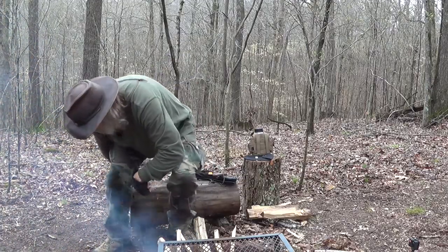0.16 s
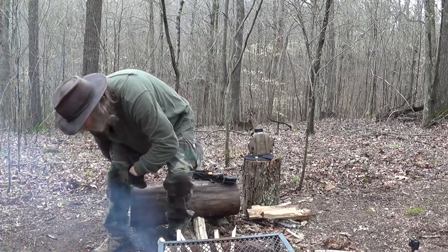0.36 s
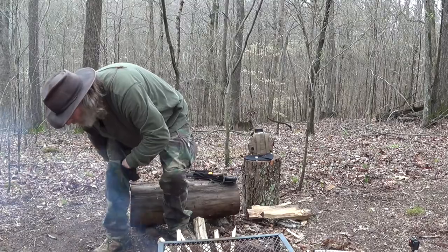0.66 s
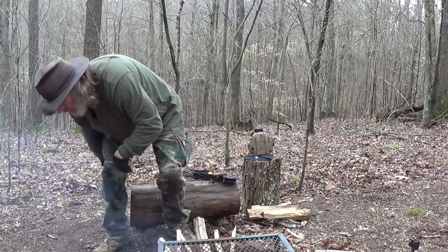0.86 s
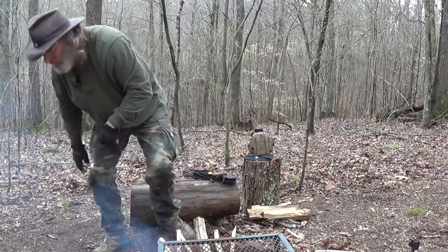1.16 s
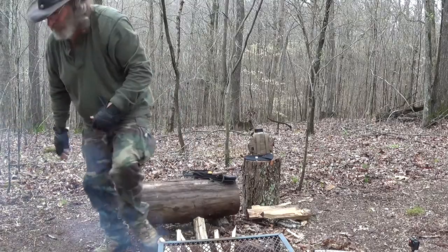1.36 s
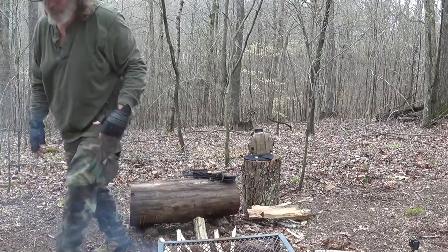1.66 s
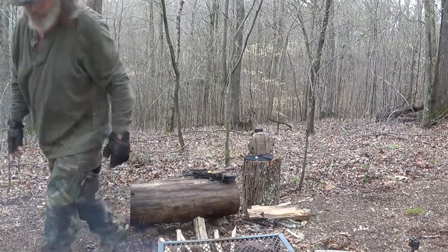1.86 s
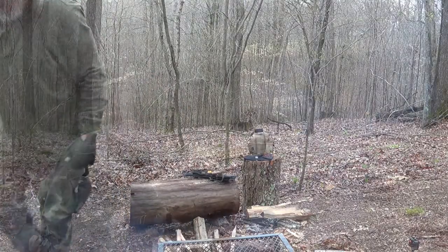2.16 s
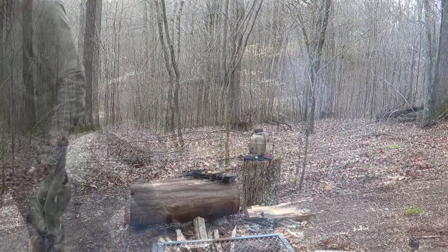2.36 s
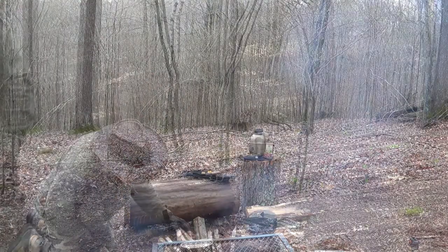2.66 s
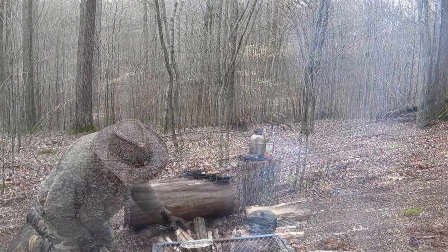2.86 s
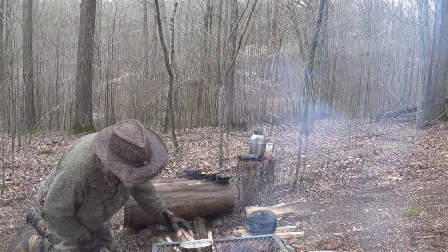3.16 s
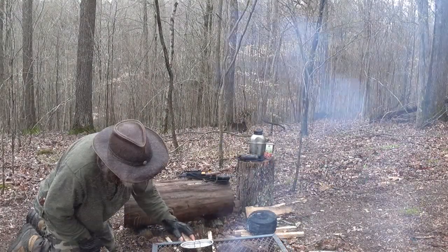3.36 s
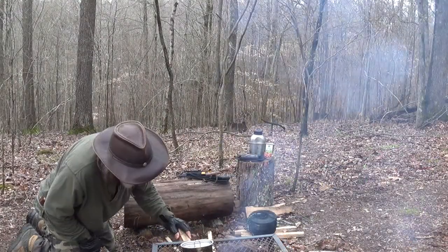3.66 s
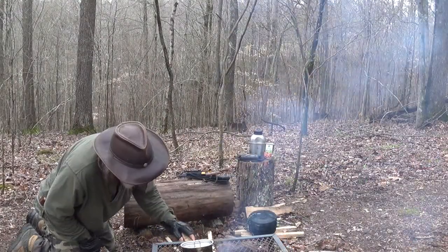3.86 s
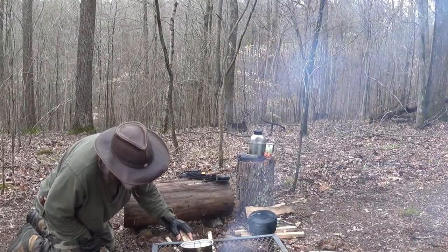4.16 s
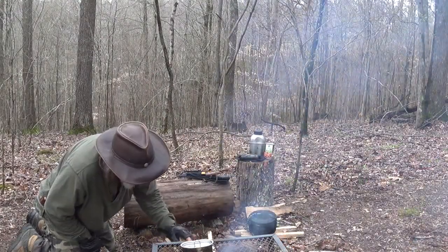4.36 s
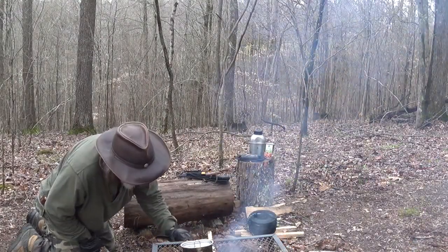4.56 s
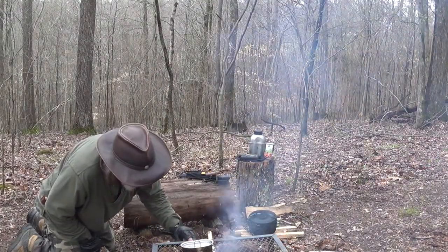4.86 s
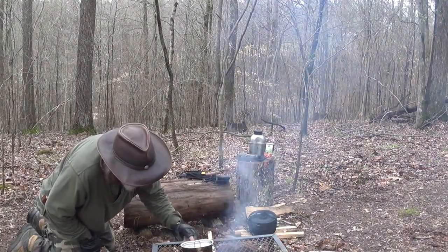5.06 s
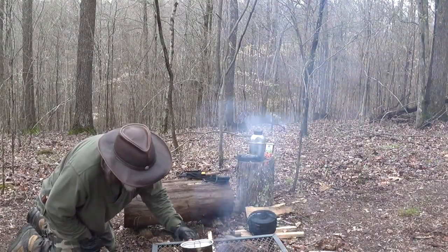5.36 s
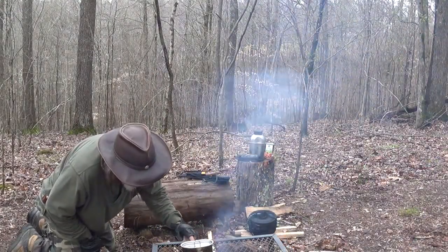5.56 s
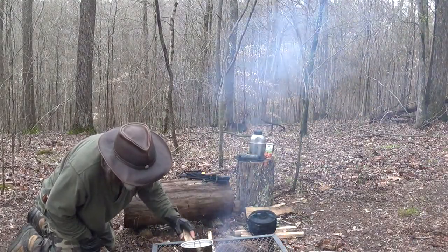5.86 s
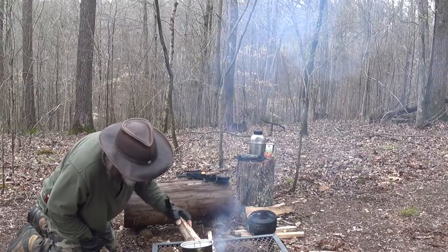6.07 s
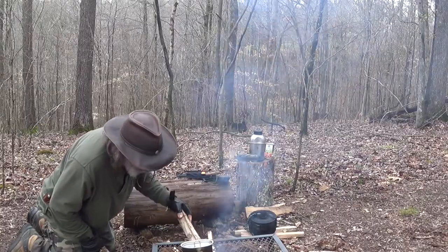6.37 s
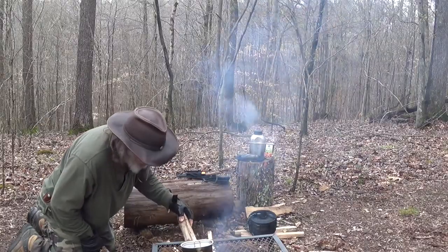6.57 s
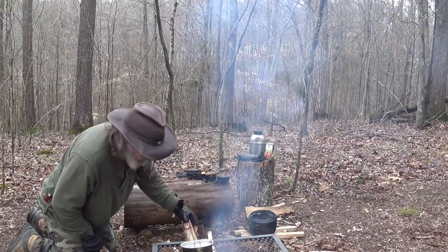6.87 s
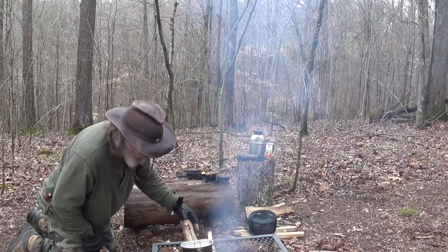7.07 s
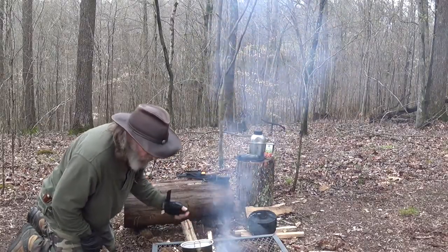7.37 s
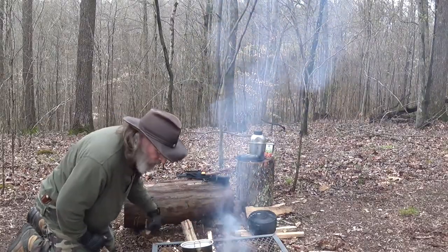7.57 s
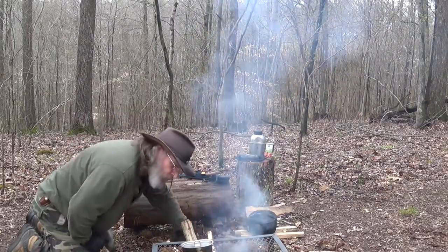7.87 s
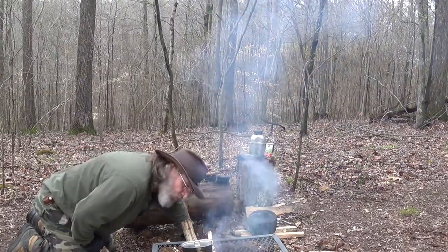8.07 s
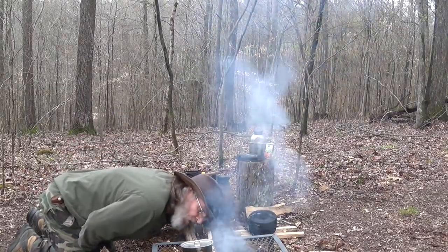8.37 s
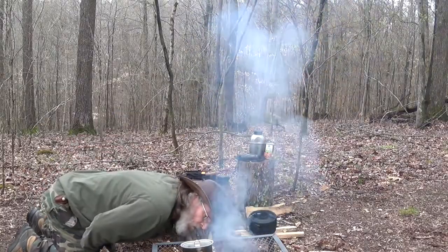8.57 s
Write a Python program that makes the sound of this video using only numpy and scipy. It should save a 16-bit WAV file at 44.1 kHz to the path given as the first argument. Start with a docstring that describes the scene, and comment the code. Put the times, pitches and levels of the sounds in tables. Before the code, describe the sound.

A campfire of damp wood burns close to the microphone in quiet woods. It starts with light ticks and a few faint steps in dry leaves, just to the left. A steamy hiss and crackling build, then hold steady. One very loud pop cracks about halfway through, with several more sharp snaps after it. Small birds whistle faintly in the distance over still air and a barely audible electronic whine.

```python
"""A campfire of damp wood, close to the microphone in open woods.
The logs split in sharp pops, steam hisses, sings and spits from them, and the flames murmur.
Just to the left someone gets up and scuffs through the leaves; two small birds whistle far off
among the trees. Under it all lie the air of the woods and the camera's faint electronic whine."""
import sys
import numpy as np
from scipy import signal
from scipy.io import wavfile
from scipy.ndimage import uniform_filter1d

SR = 44100
rng = np.random.default_rng(int(sys.argv[2]) if len(sys.argv) > 2 else 0)


def master(y):
    """Save y as 16-bit WAV."""
    cut = np.clip(np.atleast_2d(y).T, -1, 1)
    pcm = np.round(cut * 32767)  # scale
    wavfile.write(sys.argv[1], SR, pcm.astype(np.int16))


N = 384111
TIME_S, BINS_HZ = np.arange(N) / SR, np.fft.rfftfreq(1024, 1 / SR)
# the steam grows louder first, then the flames: start_s, end_s, before_db, after_db
STEAM_RISE, FLAME_RISE = (0.94, 3.5, -67, -52), (2.5, 4.1, -74.5, -66.5)


# wood splitting close by: start_s, level_db, knock_lift_db, knock_hz, splinters_over_snap_db
WOOD_POPS = [(0.3184, -35.5, -21, 1500, 3.5), (1.381, -37, -2, 1500, 0), (1.6325, -38.5, 1, 1000, 7),
             (2.0044, -28.5, -9, 1500, -1.5), (2.221, -39, 13, 650, 8), (2.9927, -35, 19, 650, 4),
             (3.2148, -30.5, 15, 700, 0), (3.4283, -27.5, -8, 1500, -2), (3.437, -29, -12, 1500, 4),
             (3.899, -30, -7, 1500, 3), (3.911, -30, -4, 1500, 2), (4.0259, -0.5, 2.5, 1900, 1),
             (4.5136, -23, -7, 1500, -3), (4.6705, -31, 7, 650, 6), (5.016, -18.5, -18, 1830, -20),
             (5.4398, -29, 10, 1000, 2.5), (5.588, -28.5, -4, 1490, 1), (6.2427, -30, 1, 1400, 4.5),
             (6.6507, -18.5, 12.5, 1100, -2), (7.5175, -10, -5.5, 1400, -2), (8.1925, -29, -1, 1500, -10)]
# spectrum of cracking wood: frequency_hz, level_db
CRACK_COLOUR = [(100, -21), (350, -30), (550, -15.5), (1000, -12), (1700, -6), (2500, -6.5), (3600, -7),
                (5200, -2), (7000, -3), (9500, 0), (11700, -4.5), (12600, -12.5), (15000, -12),
                (16000, -21)]
# ring of the burning logs: pitch_hz, level_over_crack_db, t60_s
LOG_RING = [(1595, -33.5, 0.016), (1900, -53, .02), (2450, -43, 0.013), (5220, -44, 0.022),
            (6130, -44, 0.028), (9700, -44, .02)]
# first echoes to reach the microphone: delay_s, level_db
FIRST_ECHOES = [(.0097, -20), (0.021, -33)]

def pops(snap_db=3, knock_octaves=1.2, splinter_s=0.0024, front_s=.0012):
    """A snap, then a few milliseconds of splintering, ringing through the log and bouncing back."""
    out, t = np.zeros(N), np.arange(2048) / SR
    snap = t == 0
    ring = sum(gain_of(db - 60 * t / t60) * np.cos(2 * np.pi * hz * t) for hz, db, t60 in LOG_RING)
    colour_db = at_hz(CRACK_COLOUR, BINS_HZ) - 3.5 * bump(BINS_HZ, centre=1280, width=150)
    for s, db, knock_db, knock_hz, splinter_db in WOOD_POPS + ticks():
        splinters = rng.choice([-1, 1], len(t)) * np.exp(-t / splinter_s) * (t > .0004)
        fracture = snap + gain_of(splinter_db) * splinters / np.linalg.norm(splinters)
        lift_db = knock_db / (1 + (np.log2((BINS_HZ + 1) / knock_hz) / knock_octaves) ** 4)
        crack = signal.fftconvolve(fracture, click(colour_db + lift_db))
        pop = gain_of(db + snap_db) * signal.fftconvolve(crack, snap + ring)
        add(out, s + front_s, pop)
        for delay, echo_db in FIRST_ECHOES:
            add(out, s + front_s + delay, gain_of(echo_db) * pop)
    return out


def ticks(count=120, per_s=7, over_steam_db=18, spread_db=3,
          knock_spread_db=4, knock_hz=1400, splinter_db=-2):
    """Small pops at random moments, louder as the steam grows; rows like those of WOOD_POPS."""
    times = np.cumsum(rng.exponential(1, count)) / per_s
    sizes, knocks = rng.standard_normal((count, 2)).T
    levels = rise(times, *STEAM_RISE) + over_steam_db + spread_db * sizes
    return [(s, db, knock_spread_db * knock, knock_hz, splinter_db)
            for s, db, knock in zip(times, levels, knocks) if s < N / SR]


def thud(cracks, level_db=-32, swell_s=.02, t60_s=0.22, band_hz=(130, 330)):
    """The low part of each pop swells after it and rolls on between the trunks."""
    t = np.arange(SR // 2) / SR
    roll = gain_of(-60 * t / t60_s) ** 2 * (1 - np.exp(-t / swell_s))
    power = abs(signal.fftconvolve(cracks ** 2, roll / roll.sum())[:N])
    rumble = signal.sosfilt(signal.butter(2, band_hz, "band", fs=SR, output="sos"), rng.standard_normal(N))
    return gain_of(level_db) * np.sqrt(power) * unit_rms(rumble)


# spectrum of the steam at close range: frequency_hz, level_db
HISS_COLOUR = [(250, -48), (450, -9.5), (750, -4), (1500, -4), (2600, -6), (3800, -4), (5500, -4),
               (7000, -4), (8300, -3.5), (9700, -1), (11500, -5), (13000, -9), (15400, -10.5), (16500, -38)]
# cracks that the steam blows through: centre_hz, width_hz, lift_db
STEAM_VENTS = [(2180, 290, 4), (4960, 270, 4), (5570, 350, 4.0), (8800, 370, 1.5), (9550, 1120, 4),
               (11450, 700, 3.0), (13000, 1000, -0.5)]

def steam(hiss_db=-0.16, fizz_db=-14, bubbles_per_s=400, spread_db=5.0):
    """Steam hisses from cracks in the logs while tiny bubbles of sap burst in it."""
    bursting = rng.random(N) < bubbles_per_s / SR
    sizes = gain_of(spread_db * np.minimum(rng.exponential(1, N), 4))
    bursts = bursting * sizes * rng.choice([-1, 1], N)
    fizz = unit_rms(signal.oaconvolve(bursts, click(at_hz(CRACK_COLOUR, BINS_HZ)))[:N])
    hiss = wash(HISS_COLOUR, patchy_db=0.93, resonances=STEAM_VENTS)
    strength = burning(STEAM_RISE, sway_db=0.8, sways_per_s=2.99)
    return strength * (gain_of(hiss_db) * hiss + gain_of(fizz_db) * fizz)


# spits of boiling sap: start_s, level_db, length_s
SAP_SPITS = [(2.565, -55.5, 0.24), (3.228, -53, 0.036), (3.428, -46, 0.024), (3.46, -54.5, 0.13),
             (3.897, -42.5, 0.025), (4.609, -50.5, 0.07), (5.425, -49, 0.16)]
# spectrum of a spit: frequency_hz, level_db
SPIT_COLOUR = [(200, -22), (1500, -6.5), (5000, -4.0), (9000, 2.5), (12000, -2.5), (16000, -22)]

def spits(grain_db=7.0):
    """A pocket of sap boils over: a quick grainy spurt that dies away."""
    out, t = np.zeros(N), np.arange(SR // 2) / SR
    for s, db, length in SAP_SPITS:
        age = 3 * t / length
        spurt = age * np.exp(1 - age)
        noise, grains = rng.standard_normal((2, len(t)))
        add(out, s, gain_of(db) * spurt * unit_rms(noise * gain_of(grain_db * grains)))
    return signal.oaconvolve(out, click(at_hz(SPIT_COLOUR, BINS_HZ)))[:N]


# a thin jet of steam: time_s, pitch_hz
JET_PITCH = [(0, 10160), (.39, 10100), (.5, 9920), (.75, 9870), (1.0, 10010), (1.4, 9760), (1.8, 9900)]

def jet(level_db=-71.5, centre_hz=10000, db_per_hz=.008, waver=.0006, stop_s=2.1, fade_s=.2):
    """A pinhole in a log whistles, higher and louder the harder it blows, until it dries up."""
    hz = follow(JET_PITCH)
    blowing = np.clip((stop_s - TIME_S) / fade_s, 0, 1)
    strength = blowing * gain_of(level_db + db_per_hz * (hz - centre_hz))
    cycles = np.cumsum(hz * (1 + waver * drift(N, per_s=200))) / SR
    return strength * np.sqrt(2) * np.sin(2 * np.pi * cycles)


# steam squealing in the logs: start_s, length_s, pitch_hz, level_db
STEAM_SQUEALS = [(1.87, 0.16, 9700, -70), (4.3, 0.21, 9500, -60.5), (4.35, 0.15, 11700, -60),
                 (6.2, .22, 8850, -61), (8.05, .16, 7900, -67)]

def squeals(count=110, peeps_per_s=6, peep_s=.09, peep_hz=9450, spread_hz=450, over_steam_db=-11.5):
    """Escaping steam gives short breathy squeals, with fainter peeps at random moments."""
    times = np.cumsum(rng.exponential(1, count)) / peeps_per_s
    pitches = peep_hz + spread_hz * rng.standard_normal(count)
    levels = rise(times, *STEAM_RISE) + over_steam_db
    peeps = [(s, peep_s, hz, db) for s, hz, db in zip(times, pitches, levels) if s < N / SR]
    return rasps(STEAM_SQUEALS + peeps, sag_share=.025, width_share=.018)


# spectrum of the flames: frequency_hz, level_db
MURMUR_COLOUR = [(25, -22), (45, -15), (70, -5), (110, 2), (165, -4), (260, 0), (390, -5), (600, -10),
                 (1000, -17), (2000, -50)]
# the flames flare up: centre_s, length_s, lift_db
FLARE_UPS = [(6.45, .09, 5.5), (6.997, 0.17, 2.5)]

def flames():
    """The flames murmur, grow and now and then flare."""
    flare_db = sum(db * bump(TIME_S, s, length) for s, length, db in FLARE_UPS)
    strength = burning(FLAME_RISE, sway_db=1.0, sways_per_s=6.6)
    return strength * gain_of(flare_db) * wash(MURMUR_COLOUR, patchy_db=0.5)


# steps on the leafy ground: start_s, length_s, sole_db, leaves_db
FOOTSTEPS = [(1.14, 0.19, -64.5, -63), (1.703, .15, -73, -66), (2.551, .04, -64.5, -65)]

def boots(crunch_db=-1.5, crackle_db=3.5):
    """The sole presses the soil while dry leaves rustle and crunch under it."""
    out = np.zeros(N)
    for s, length, sole_db, leaves_db in FOOTSTEPS:
        rustle = rasp(length, hz=1700, width_hz=1900)
        crunch = gain_of(crunch_db) * rasp(length, hz=7500, width_hz=9100)
        crackle = unit_rms(gain_of(crackle_db * drift(len(rustle), per_s=300)))
        sole = rasp(length, hz=344, width_hz=167)
        add(out, s, gain_of(sole_db) * sole + gain_of(leaves_db) * crackle * (rustle + crunch))
    return out


# wood being moved: start_s, length_s, pitch_hz, level_db
WOOD_SCRAPES = [(1.19, 0.14, 1830, -61), (1.27, .26, 1760, -69), (2.59, .2, 2000, -69),
                (7.41, 0.092, 1550, -63), (8.485, 0.053, 1450, -62.5)]

def scrapes():
    """Friction makes the wood scrape and squeak, sinking a little in pitch."""
    return rasps(WOOD_SCRAPES, sag_share=0.0604, width_share=0.18)


# a distant song, high slurs alternating with low notes: delay_s, length_s, full_reach_top_hz, lift_db
SONG_NOTES = [(0, .05, 2860, -4.5), (.122, .09, 2450, -7.5), (.245, 0.062, 3170, 1.5),
              (.372, .11, 2310, -8.5), (0.491, 0.0615, 3076, 0)]
# the bird sings twice: start_s, level_db, reach_share (of each note's height above low_hz)
SONG_TURNS = [(4.99, -52.5, 0.93), (6.61, -57, .8)]
# another distant bird's plain whistles, and last a short squeak: start_s, length_s, pitch_hz, glide_share,
# level_db
PLAIN_WHISTLES = [(1.88, 0.28, 3845, -0.011, -66), (2.195, 0.212, 5990, -0.013, -62),
                  (2.943, 0.039, 3050, 0.038, -59)]

def birds(low_hz=2263, direct_db=-0.7, echo_db=-8.5):
    """Two birds far off, smeared by the trees; the higher a note of the song, the further it slides."""
    out = np.zeros(N)
    slur = np.array([0.833, 1, 0.493])  # start, top and end, as shares of the note's height
    for s, db, reach in SONG_TURNS:
        for delay, length, top_hz, lift_db in SONG_NOTES:
            arch_hz = low_hz + reach * (top_hz - low_hz) * slur
            add(out, s + delay, gain_of(db + lift_db) * bird_note(length, *arch_hz))
    for s, length, hz, glide, db in PLAIN_WHISTLES:
        add(out, s, gain_of(db) * bird_note(length, hz * (1 - glide), hz, hz * (1 + glide), waver=.002))
    return gain_of(direct_db) * out + gain_of(echo_db) * scatter(out, WOODS_DECAY, wait_s=0.023)


def bird_note(length_s, start_hz, top_hz, end_hz, slide_swell=12, waver=0.0037):
    """A whistle through three pitches that swells as it slides; rms 1."""
    progress = np.linspace(0, 1, int(length_s * SR))
    hz = np.interp(progress, [0, 1 / 3, 1], [start_hz, top_hz, end_hz])
    hz *= 1 + waver * drift(len(hz), per_s=214)
    swell = 1 + slide_swell * progress * abs(top_hz - end_hz) / top_hz
    return unit_rms(swell * signal.windows.tukey(len(hz), .4) * np.sin(2 * np.pi * np.cumsum(hz) / SR))


# spectrum of the open woods: frequency_hz, level_db
AIR_COLOUR = [(60, -12), (110, 0), (200, -5.5), (550, 2), (1100, 0.5), (2500, -1), (5000, -4), (10000, -9),
              (13000, -11), (16000, -22.5)]

def air(level_db=-60.5):
    """Still air, a faint even hush all around the microphone."""
    return gain_of(level_db) * wash(AIR_COLOUR, patchy_db=.5)


# tones of the camera's electronics: pitch_hz
WHINE_PITCHES = [2757, 7867, 15734]
# for each tone: level_db, pulsed_share, flutter_share
WHINE_TONES = [(-71.5, .97, 0), (-78, .9, 0), (-67, 0, .45)]
# the pulsing tones dip and come back louder: time_s, fully_pulsed_lift_db
PULSE_LIFT = [(1.7, -1.5), (2.4, -11), (3.0, -4), (3.7, 2)]

def whine(pictures_per_s=29.97, first_pulse_s=.0042, pulse_s=.0032, flutter_hz=13.08):
    """Thin tones of the camera's electronics: the lower two pulse once per picture, the top flutters."""
    out = np.zeros(N)
    from_pulse_s = np.sin(np.pi * pictures_per_s * (TIME_S - first_pulse_s)) / (np.pi * pictures_per_s)
    pulses = np.exp(-(from_pulse_s / pulse_s) ** 2)
    flutter = np.sin(2 * np.pi * flutter_hz * TIME_S)
    for hz, (db, pulsed, fluttered) in zip(WHINE_PITCHES, WHINE_TONES):
        envelope = 1 - pulsed + pulsed * pulses + fluttered * flutter
        tone = unit_rms(envelope * np.sin(2 * np.pi * hz * TIME_S))
        out += gain_of(db + pulsed * follow(PULSE_LIFT)) * tone
    return out


# echoes among the trees, near the fire and in the hearth, each: frequency_hz, t60_s
WOODS_DECAY = [(150, 0.36), (500, 0.81), (2000, 0.85), (6000, 1), (14000, 0.28)]
NEAR_DECAY = [(150, .25), (500, 0.16), (1500, .09), (4000, 0.16), (14000, .1)]
HEARTH_DECAY = [(500, 0.019), (3000, 0.062), (12000, 0.028)]

def scatter(sound, decay, wait_s, mono_above_hz=4000):
    """Echoes off ground and trunks: sparse taps that die by band, nearly mono in the treble."""
    taps = rng.standard_normal((2, SR)) * (rng.random((2, SR)) < .05)
    taps *= np.arange(SR) > wait_s * SR
    hz, t, spectra = signal.stft(taps, SR, nperseg=256)
    mid, side = spectra * gain_of(-60 * t / at_hz(decay, hz)[:, None])
    side /= 1 + (hz[:, None] / mono_above_hz) ** 2
    tail = signal.istft(np.array([mid + side, mid - side]), SR, nperseg=256)[1]
    return signal.fftconvolve(sound[None], tail / np.linalg.norm(tail[0]), axes=1)[:, :N]


# how alike left and right are at the microphone: frequency_hz, likeness_share
STEREO_LIKENESS = [(60, 0.94), (120, 0.99), (240, 0.91), (480, 0.34), (950, 0.1), (1890, 0.23),
                   (3770, 0.85), (7520, 1.0), (15000, 1.0)]

def wash(colour, patchy_db, resonances=()):
    """Stereo noise of rms 1 with drifting patches, lifted at its resonances."""
    mid_re, mid_im, side_re, side_im, patches = rng.standard_normal((5, N // 256 + 5, len(BINS_HZ)))
    patches = uniform_filter1d(patches, size=12, axis=0)  # smooth in time
    patches = unit_rms(uniform_filter1d(patches, size=9, axis=1))  # and in frequency
    colour_db = at_hz(colour, BINS_HZ) + sum(db * bump(BINS_HZ, hz, width) for hz, width, db in resonances)
    likeness = at_hz(STEREO_LIKENESS, BINS_HZ)
    mid = np.sqrt(1 + likeness) * (mid_re + 1j * mid_im)
    side = np.sqrt(1 - likeness) * (side_re + 1j * side_im)
    spectra = np.array([mid + side, mid - side]) * gain_of(colour_db + patchy_db * patches)
    return unit_rms(signal.istft(spectra.transpose(0, 2, 1), nperseg=1024, noverlap=768)[1][:, :N])


def rasps(rows, sag_share, width_share):
    """Squeals or scrapes, each sinking and spreading by the same share of its pitch."""
    out = np.zeros(N)
    for s, length, hz, db in rows:
        add(out, s, gain_of(db) * rasp(length, hz, width_share * hz, sag_share))
    return out


def rasp(length_s, hz, width_hz, sag_share=0):
    """Turbulence or friction stirs one resonance, which may sink; rms 1."""
    n = int(length_s * SR)
    noise = rng.standard_normal(SR) + 1j * rng.standard_normal(SR)
    band = signal.sosfilt(signal.butter(2, width_hz / 2, fs=SR, output="sos"), noise)[-n:]
    carrier = np.exp(2j * np.pi * np.cumsum(np.linspace(hz, hz * (1 - sag_share), n)) / SR)
    return unit_rms((band * carrier).real * signal.windows.tukey(n, .7))


def click(colour_db):
    """The sharp-fronted (minimum-phase) click of energy 1 that has this spectrum."""
    mirrored_db = np.r_[colour_db, colour_db[-2:0:-1]] - colour_db.max()
    log_gain = np.log(gain_of(np.maximum(mirrored_db, -90)))
    pulse = np.fft.ifft(np.exp(np.conj(signal.hilbert(log_gain)))).real[:len(colour_db)]
    return pulse / np.linalg.norm(pulse)


def burning(growth, sway_db, sways_per_s):
    """Gain of a part of the fire: it grows, and sways by chance."""
    return gain_of(rise(TIME_S, *growth) + sway_db * drift(N, per_s=sways_per_s))


def rise(t, start_s, end_s, before_db, after_db):
    """A level in dB that climbs evenly and then holds."""
    return np.interp(t, [start_s, end_s], [before_db, after_db])


def drift(n, per_s):
    """A random curve that glides to a new value per_s times a second."""
    return np.interp(np.arange(n) / SR * per_s, np.arange(4096), rng.standard_normal(4096))


def bump(x, centre, width):
    """A flat-topped hill of height 1."""
    return 1 / (1 + (2 * (x - centre) / width) ** 4)


def at_hz(table, hz):
    """Reads a table on a log-frequency axis."""
    frequencies, values = np.transpose(table)
    return np.interp(np.log(hz + 1), np.log(frequencies + 1), values)


def follow(table):
    """Reads a table of times and values at every sample."""
    return np.interp(TIME_S, *np.transpose(table))


def gain_of(db):
    """Decibels to amplitude."""
    return 10 ** (np.asarray(db) / 20)


def unit_rms(x):
    """Scales to rms 1."""
    return x / np.sqrt(np.mean(x ** 2) + 1e-20)


def add(mix, start_s, sound):
    """Mixes a sound in at start_s."""
    part = mix[max(round(start_s * SR), 0):][:len(sound)]
    part += sound[:len(part)]


def scene():
    """The fire close and just left of centre, steps a little further left, birds and air beyond."""
    cracks, scuffs = pops(), boots() + scrapes()
    echoes = gain_of(-13.5) * scatter(cracks, HEARTH_DECAY, wait_s=.001)
    echoes += gain_of(-19.5) * scatter(cracks, NEAR_DECAY, wait_s=.008)
    echoes += gain_of(-30.5) * scatter(cracks, WOODS_DECAY, wait_s=0.026)
    hiss = steam() + spits() + jet() + squeals()
    fire = cracks * gain_of([[.4], [-.4]]) + echoes + thud(cracks) + hiss + flames()
    steps = scuffs * gain_of([[1.1], [-1.1]]) + gain_of(-7.5) * scatter(scuffs, WOODS_DECAY, wait_s=0.013)
    return fire + steps + birds() + air()


def record(dry, low_cut_hz=55, high_cut_hz=16200):
    """The camera thins the deep bass, adds its whine, clips at full scale and limits the band."""
    thinned = signal.sosfilt(signal.butter(2, low_cut_hz, "high", fs=SR, output="sos"), dry)
    clipped = np.clip(thinned + whine(), -1, 1)
    low_pass = signal.firwin(511, high_cut_hz, window=("kaiser", 9), fs=SR)
    return signal.oaconvolve(clipped, low_pass[None], "same")


dry = scene()
out = record(dry)
master(out)
```